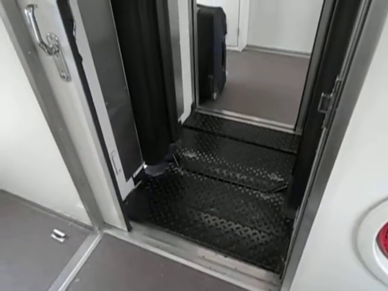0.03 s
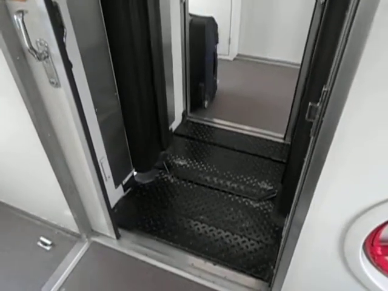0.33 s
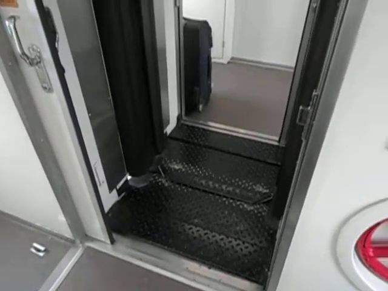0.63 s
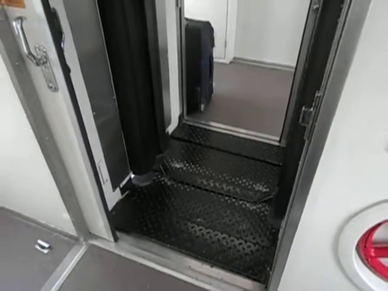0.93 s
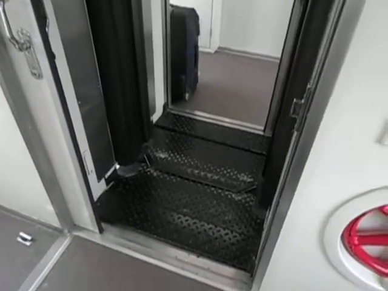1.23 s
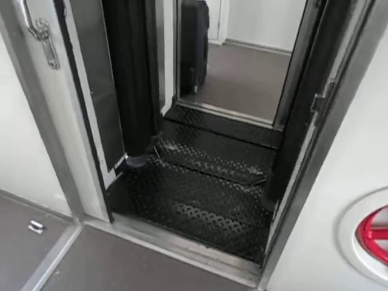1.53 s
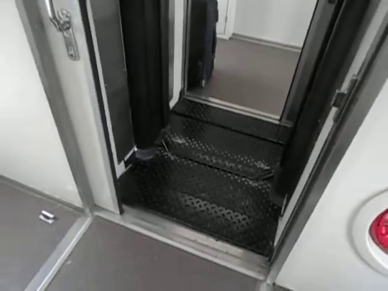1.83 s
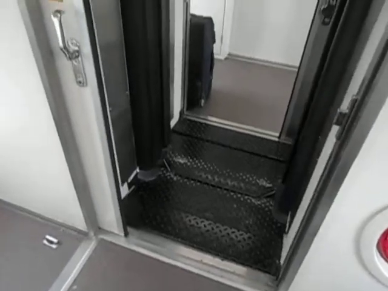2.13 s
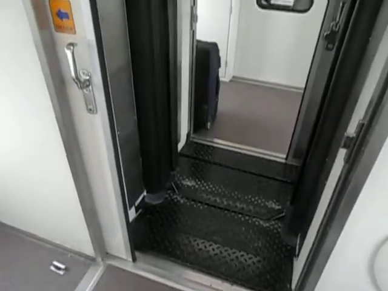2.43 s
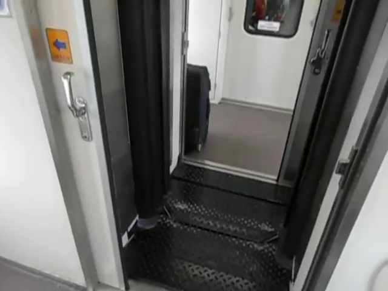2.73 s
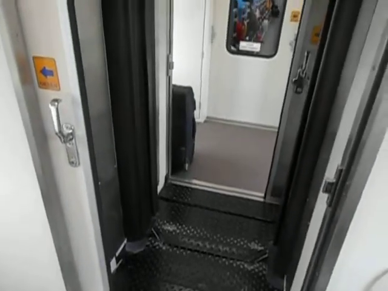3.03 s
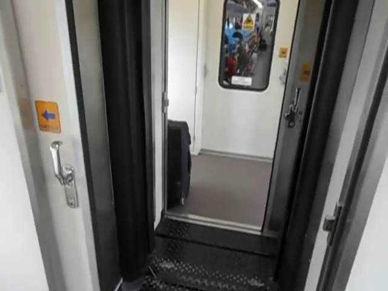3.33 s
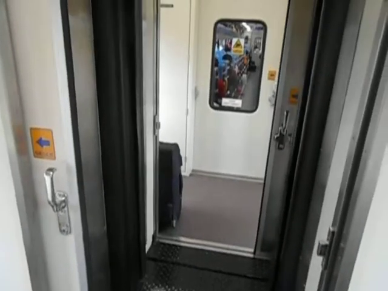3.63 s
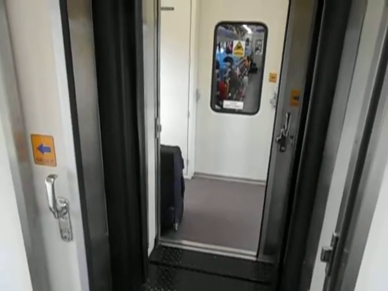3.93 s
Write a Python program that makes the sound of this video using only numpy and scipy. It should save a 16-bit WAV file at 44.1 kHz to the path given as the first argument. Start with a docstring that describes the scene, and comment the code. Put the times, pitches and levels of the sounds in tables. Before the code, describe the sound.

A moving train rumbles throughout, heard inside the narrow gangway between carriages, with a hollow boom, rail roar and airy hiss. Dull coupling thumps and brief clatters of metal floor plates come at the start, around 0.9 seconds, between 2 and 2.4, around 2.9 to 3.1, and sharply at 3.9. The boom swells near 1.8 seconds, bellows and plates rub faintly, and the roar rises slightly toward the end.

```python
"""Gangway of a moving train.

Between two carriages, wheel vibration drives the floor and the small vestibule into booming resonance.
Now and then the coupling thumps, the metal floor plates clatter, and bellows and plates rub.
Rail roar, rushing air and hiss leak in past the bellows; beneath it all the carriage rumbles."""
import sys
import numpy as np
from scipy import signal
from scipy.fft import rfft, irfft
from scipy.io import wavfile
from scipy.ndimage import uniform_filter1d

SR = 44100
rng = np.random.default_rng(int(sys.argv[2]) if len(sys.argv) > 2 else 0)


def master(y):
    """Save y as 16-bit WAV."""
    cut = np.clip(np.atleast_2d(y).T, -1, 1)
    pcm = np.round(cut * 32767)  # scale
    wavfile.write(sys.argv[1], SR, pcm.astype(np.int16))


N = 176400


# Modes of the vestibule, the first being that of the floor: f/Hz, level/dB, half-width/Hz
VESTIBULE_MODES = [(132.3, -4, 6.8), (183.5, -7, 10), (207.8, -3, 3.8), (215.5, -5.5, 6.9),
                   (258.2, -2, 11.9), (282.8, 0, 13.7), (335.3, -7, 28.5), (378.6, -9, 11),
                   (416, -11.5, 11.7), (460.2, -13, 15), (493.3, -11.5, 3.7)]
# Envelope of the air modes as the track roughens and smooths: t/s, level/dB
BOOM_ENVELOPE = [(0, -30.5), (.25, -25), (.55, -26), (.8, -23), (1.0, -26), (1.25, -27.5), (1.52, -25),
                 (1.6, -20), (1.71, -27.5), (1.78, -16.5), (1.89, -17.5), (1.98, -26), (2.1, -21.5),
                 (2.18, -24.5), (2.33, -20), (2.47, -21), (2.6, -26.5), (2.83, -21), (3.0, -30.5),
                 (3.45, -29), (3.63, -22), (4, -30.5)]
# Envelope of the floor mode: t/s, level/dB
DRONE_ENVELOPE = [(0, -38.5), (1.4, -41), (1.85, -26.5), (2.5, -42.5), (2.75, -33.5), (2.9, -20),
                  (3.15, -27.5), (3.3, -34), (3.7, -29), (4, -29.5)]

def boom():
    """Forced vibration: the wheels drive the modes of the floor and of the enclosed air at random."""
    floor = steadied(ring(noise(), VESTIBULE_MODES[:1]), window_s=0.47)
    air = steadied(ring(noise(), VESTIBULE_MODES[1:]), window_s=0.095)
    return floor * level(DRONE_ENVELOPE) + air * level(BOOM_ENVELOPE)


# Shoves of the coupling: t/s, level/dB, centre f/Hz, spread/octaves, rise/s, T60/s
COUPLING_THUMPS = [(0.042, -16, 264, 0.11, 0.012, 0.14), (.785, -20, 240, 0.73, .012, 0.28),
                   (0.86, -7, 274, 0.19, .011, .24), (1.06, -17, 284, 0.24, .014, .25),
                   (1.548, -16, 290, .06, .012, .7), (2.059, -23, 515, 0.1, 0.013, 0.17),
                   (2.155, -21, 130, 0.32, 0.0091, 0.14), (2.292, -13.5, 285, 0.28, .01, 0.23),
                   (2.403, -19.5, 275, 0.19, 0.0083, 0.27), (2.655, -19.5, 285, 0.23, 0.0122, 0.13),
                   (2.819, -17.5, 207, 0.15, 0.038, 0.45), (2.864, -9.5, 302, 0.24, .017, 0.27),
                   (3.07, -13, 198, 0.88, 0.01, .18), (3.881, -12, 328, 0.19, 0.00737, 0.19),
                   (3.908, -13, 297, 0.54, 0.0083, .16)]

def coupling_thump(db, centre_hz, spread, rise, t60):
    """Damped free vibration: a soft shove builds up the modes near its centre, which then die away."""
    t = np.arange(SR // 2) / SR
    phases = 0.66 * rng.standard_normal(len(VESTIBULE_MODES))  # scatter in radians
    tone = np.zeros(len(t))
    for (hz, _, _), phase in zip(VESTIBULE_MODES, phases):
        weight = np.exp(-(np.log2(hz / centre_hz) / spread) ** 2)
        tone += weight * np.sin(2 * np.pi * hz * (t - rise) + phase)
    envelope = np.minimum(t / rise, 1) ** 0.5 * decay(t - rise, t60)
    sound = tone * envelope
    return amp(db) * sound * np.linalg.norm(envelope) / np.linalg.norm(sound)


# Spectrum of the metal floor plates: f/Hz, level/dB
PLATE_SPECTRUM = [(120, -11), (280, -3.5), (480, -12.5), (590, 3.5), (690, 2.5), (770, -2), (900, 3.5),
                  (1150, -7), (1400, -11), (1900, -4), (2350, -5.5), (3100, -15), (3800, -18),
                  (5500, -25.5), (10000, -30), (11000, -50)]
# Bursts of clatter: t/s, level/dB, rise/s, T60/s, tilt/(dB per octave)
PLATE_CLATTERS = [(.022, -22, 0.0064, 0.35, -0.5), (.036, -22.5, 0.0023, 0.34, 0.5),
                  (.12, -26, .015, 0.34, 2), (.78, -29.5, 0.011, 0.38, -3), (.848, -21, 0.013, 0.4, -4.5),
                  (1.06, -27.5, 0.0064, 0.21, -2.5), (1.85, -26.5, 0.018, 0.32, -4),
                  (2.058, -18.5, 0.0065, 0.14, -11), (2.81, -32, 0.033, 0.31, 2),
                  (3.06, -19.5, 0.014, 0.26, -6.5), (3.79, -31, 0.036, 0.47, 4),
                  (3.886, -19.5, 0.0033, 0.3, 1.5), (3.91, -13.5, 0.0082, 0.16, -3.5)]

def plate_clatter(db, rise, t60, tilt_db):
    """Impact noise: dense collisions between the plates merge into a quickly fading burst."""
    t, hz = np.arange(SR // 2) / SR, np.fft.rfftfreq(SR // 2, 1 / SR)
    chatter = grainy(depth_db=2.5, rate_hz=540)[:len(t)]
    octaves = np.log2(np.maximum(hz, 200) / 1000)
    spectrum = amp(read(PLATE_SPECTRUM, hz) + tilt_db * octaves)
    sound = unit(irfft(rfft(chatter) * spectrum, len(t)))
    return amp(db) * sound * np.minimum(t / rise, 1) * decay(t - rise, t60)


# Spectrum of the rolling noise: f/Hz, level/dB
ROAR_SPECTRUM = [(100, -11), (180, 1), (300, 1.5), (430, 2), (550, -7), (660, -8.5), (780, -9.5),
                 (880, -11), (1030, -9.5), (1250, -16), (1700, -19), (3000, -52)]
# Modes of the wall panels: f/Hz, level/dB, half-width/Hz
PANEL_MODES = [(523, 6, 8.1), (589, 0, 19.4), (659.5, -3.5, 5.8), (728.4, -3.5, 40), (853, -4, 33),
               (885, -3, 24), (1016, -4, 28), (1103, -3.5, 6.5)]
# Envelope of the roar: t/s, level/dB
ROAR_ENVELOPE = [(0, -34.5), (.35, -34.5), (.8, -30), (1.0, -31), (1.35, -32), (1.6, -28.5), (1.87, -28),
                 (1.98, -29), (2.2, -28.5), (2.35, -27.5), (2.6, -29), (2.88, -25.5), (3.3, -33),
                 (3.6, -28), (3.85, -25.5), (4, -24)]

def rail_roar():
    """Sound transmission: rolling noise leaks through the bellows, and the wall panels resonate."""
    rolling = coloured(grainy(depth_db=1.9, rate_hz=55), ROAR_SPECTRUM)
    panels = amp(-7) * ring(noise(), PANEL_MODES)
    return unit(rolling + panels) * level(ROAR_ENVELOPE)


# Spectrum of the rushing air: f/Hz, level/dB
RUSH_SPECTRUM = [(600, -20), (1200, -8), (1500, -3.5), (1800, -6), (2050, 3), (2550, -4.5), (2800, -3),
                 (3000, -9.5), (3450, -9.5), (3700, -8), (4100, -10.5), (4500, -15.5), (5200, -18),
                 (9000, -38)]
# Modes of the door frame: f/Hz, level/dB, half-width/Hz
DOOR_FRAME_MODES = [(1972, -0.5, 60), (2153, -6, 61), (2300, -9, 18), (2760, -0.5, 25), (3666, -8, 76),
                    (3930, -17, 23), (4680, -17, 27)]
# Envelope of the rush: t/s, level/dB
RUSH_ENVELOPE = [(0, -36.5), (.35, -43), (.6, -39.5), (.8, -39), (1, -42.5), (1.25, -41.5), (1.6, -36.5),
                 (1.87, -36), (2, -38.5), (2.5, -37.5), (2.83, -34.5), (3.0, -38), (3.25, -39), (3.65, -35),
                 (3.83, -33), (4, -35)]

def air_rush():
    """Broadband excitation: air rushes past the bellows, and the door frame rings at its modes."""
    draught = coloured(grainy(depth_db=-0.2, rate_hz=104), RUSH_SPECTRUM)
    frame = amp(-9) * ring(noise(), DOOR_FRAME_MODES)
    return unit(draught + frame) * level(RUSH_ENVELOPE)


# Spectrum of the hiss: f/Hz, level/dB
HISS_SPECTRUM = [(2500, -3), (4500, -0.5), (5400, -2.5), (6000, 2.5), (7500, 1), (8500, -2), (10000, -1.5),
                 (10500, -3), (11000, -26), (11600, -34), (12200, -34)]
# Envelope of the hiss: t/s, level/dB
HISS_ENVELOPE = [(0, -46.5), (.15, -44.5), (.3, -50), (.55, -46), (.75, -47), (.9, -41.5), (1.02, -48),
                 (1.28, -48), (1.4, -45), (1.9, -42), (2.02, -43.5), (2.15, -43.5), (2.55, -43),
                 (2.86, -43), (2.97, -43.5), (3.25, -46.5), (3.6, -42), (3.88, -40.5), (4, -43)]

def air_hiss():
    """Flow noise: the leaking air radiates a broad band of treble."""
    return coloured(grainy(depth_db=0.43, rate_hz=170), HISS_SPECTRUM) * level(HISS_ENVELOPE)


# Rubs of the bellows and plates: t/s, duration/s, f/Hz, half-width/Hz, level/dB
FRICTION_SCUFFS = [(.005, .15, 905, 18, -28.5), (0.858, 0.053, 6300, 370, -43.5),
                   (1.857, 0.12, 10100, 960, -47), (2.16, .08, 9200, 600, -48), (2.15, 0.6, 890, 8.7, -38),
                   (2.721, 0.23, 7960, 2100, -45)]

def scuff(duration, hz, width, db):
    """Frictional excitation: rubbing feeds one narrow resonance, which swells and fades."""
    band = ring(noise(SR), [(hz, 0, width)])[:int(duration * SR)]
    return amp(db) * np.hanning(len(band)) * unit(band)


# Spectrum of the shuddering carriage body: f/Hz, level/dB
SHUDDER_SPECTRUM = [(3, -11), (10, 6.5), (22, -1.5), (38, -6), (60, -14.5), (90, -13), (107, -26),
                    (170, -21.5), (400, -66)]
# Modes of the running gear: f/Hz, level/dB, half-width/Hz
GEAR_MODES = [(46.6, -1, 8), (71, -1, 6), (100, -8, 8.2)]
# Envelope of the gear's growl: t/s, level/dB
GEAR_ENVELOPE = [(0, -42), (1, -32), (1.7, -33.5), (2.15, -29), (2.6, -38), (3.3, -30.5), (4, -27.5)]

def carriage_rumble():
    """Structure-borne sound: the body shudders at the lower limit of hearing; the running gear growls."""
    shudder = amp(-22.5) * coloured(noise(), SHUDDER_SPECTRUM)
    growl = level(GEAR_ENVELOPE) * ring(noise(), GEAR_MODES)
    return shudder + growl


def amp(db):
    """Amplitude ratio of a level in decibels."""
    return 10 ** (np.asarray(db) / 20)


def unit(x):
    """Normalisation to rms 1."""
    return x / np.sqrt(np.mean(x ** 2) + 1e-20)


def decay(t, t60):
    """Exponential decay from t = 0, by 60 dB in t60 seconds."""
    return amp(-60 * np.maximum(t, 0) / t60)


def read(spectrum, hz):
    """Interpolation of a spectrum on a log-frequency axis."""
    f, db = np.transpose(spectrum)
    return np.interp(np.log(hz + 1), np.log(f + 1), db)


def level(envelope):
    """Gain over time, interpolated in decibels."""
    t, db = np.transpose(envelope)
    return amp(np.interp(np.arange(N) / SR, t, db))


def noise(samples=N):
    """White Gaussian noise."""
    return rng.standard_normal(samples)


def wander(rate_hz):
    """Low-pass random fluctuation of rms 1."""
    hz = np.fft.rfftfreq(N, 1 / SR)
    return unit(irfft(rfft(noise()) / (1 + (hz / rate_hz) ** 4), N))


def grainy(depth_db, rate_hz):
    """Random amplitude modulation: noise whose strength flickers."""
    return noise() * amp(depth_db * wander(rate_hz))


def coloured(x, spectrum):
    """Spectral shaping, at rms 1."""
    hz = np.fft.rfftfreq(len(x), 1 / SR)
    return unit(irfft(rfft(x) * amp(read(spectrum, hz)), len(x)))


def ring(x, modes):
    """Resonant filtering, at rms 1: each mode is 6 dB down one half-width from its peak."""
    hz = np.fft.rfftfreq(len(x), 1 / SR)
    power = sum(amp(db) ** 2 / (1 + ((hz - f) / width) ** 2) ** 2 for f, db, width in modes)
    return unit(irfft(rfft(x) * np.sqrt(power), len(x)))


def steadied(x, window_s):
    """Compression: division by the running rms evens out the slow swings of narrow-band noise."""
    return x / np.sqrt(uniform_filter1d(x ** 2, int(window_s * SR)) + 0.055)


def add(mix, start_s, sound):
    """Superposition of a sound from a given time."""
    part = mix[round(start_s * SR):][:len(sound)]
    part += sound[:len(part)]


def scene():
    """Superposition of the ride and its knocks; roar, rush and hiss share one random flutter."""
    mix = carriage_rumble() + boom()
    flutter = wander(rate_hz=10.4)
    for source, depth_db in (rail_roar, 0.8), (air_rush, 0.5), (air_hiss, 0.63):
        mix += source() * amp(depth_db * flutter)
    events = (coupling_thump, COUPLING_THUMPS), (plate_clatter, PLATE_CLATTERS), (scuff, FRICTION_SCUFFS)
    for source, table in events:
        for start_s, *settings in table:
            add(mix, start_s, source(*settings))
    return mix[None]


def record(dry):
    """Soft saturation rounds the loudest peaks; a low-pass filter then limits the band."""
    ceiling, cutoff_hz = 0.7, 12100
    rounded = dry / (1 + (dry / ceiling) ** 8) ** (1 / 8)
    low_pass = signal.firwin(511, cutoff_hz, window=("kaiser", 9), fs=SR)
    return signal.oaconvolve(rounded, low_pass[None], "same")


dry = scene()
out = record(dry)
master(out)
```